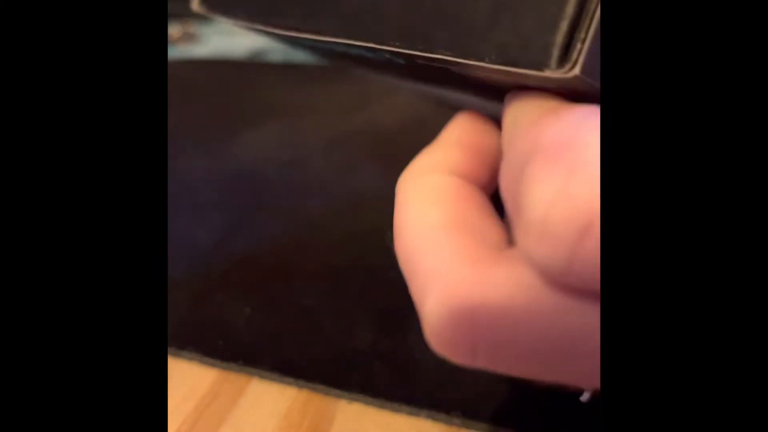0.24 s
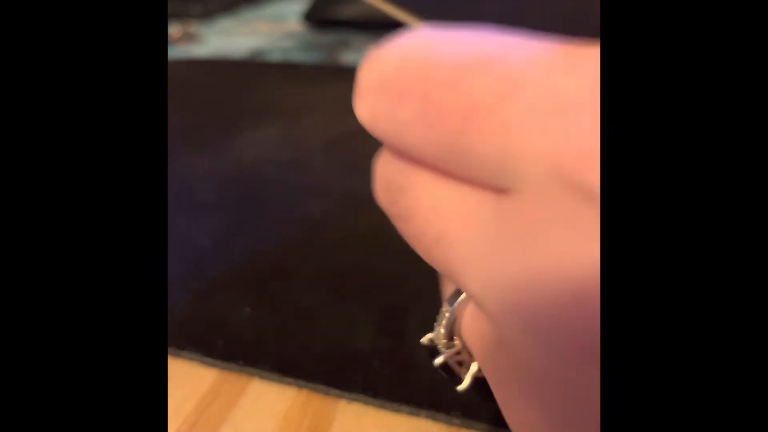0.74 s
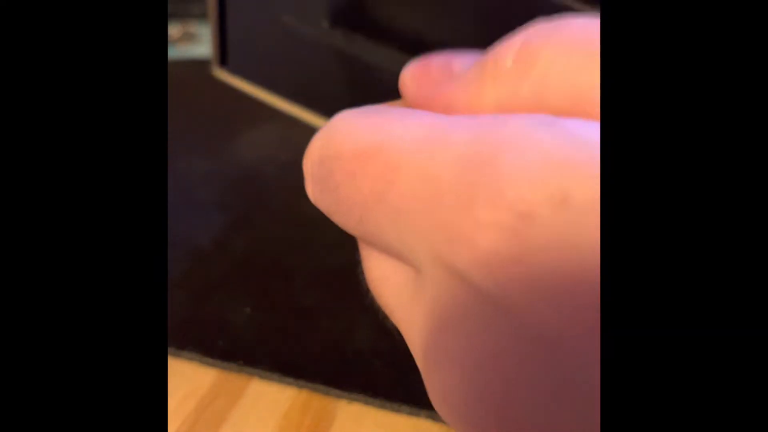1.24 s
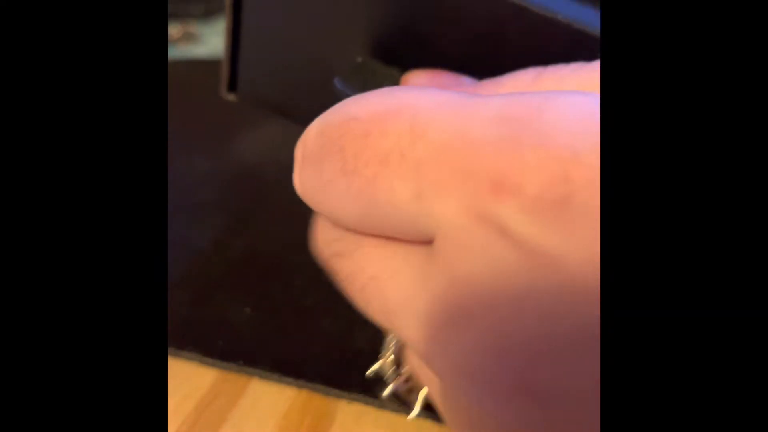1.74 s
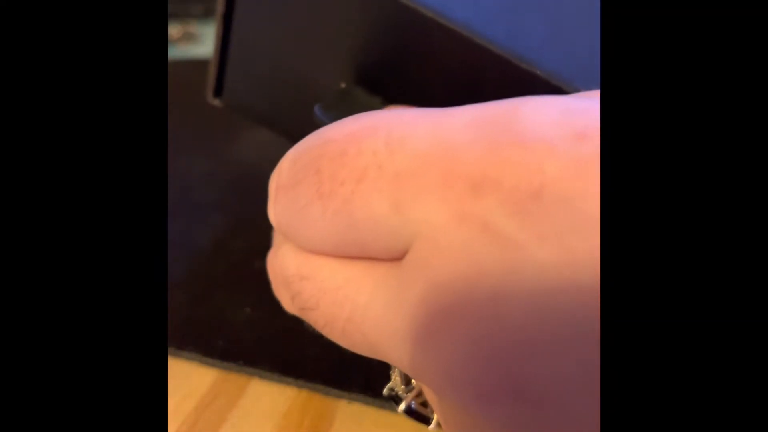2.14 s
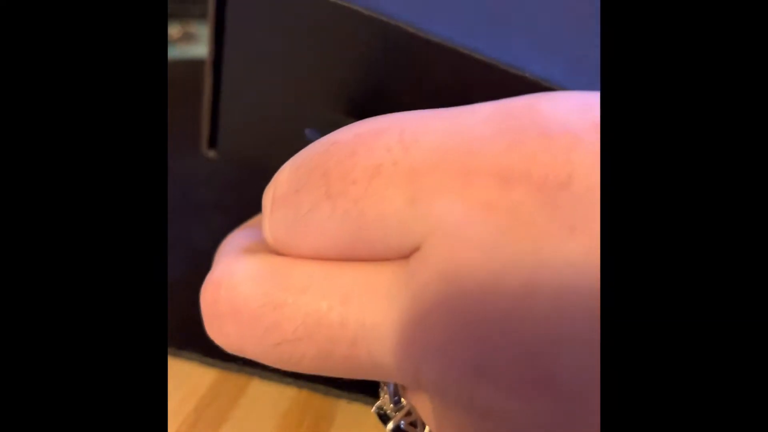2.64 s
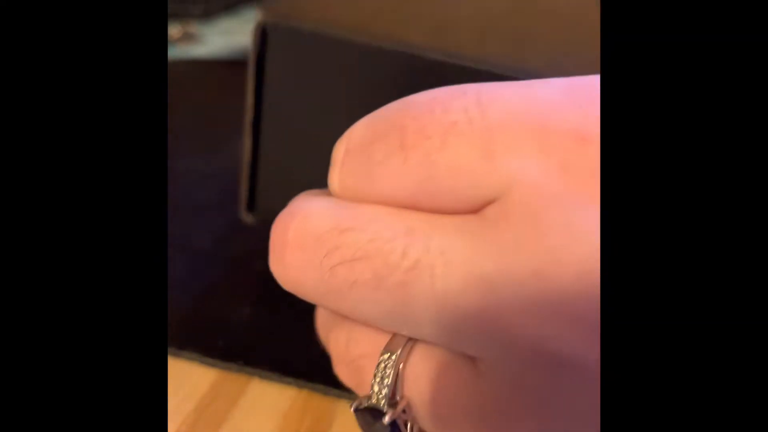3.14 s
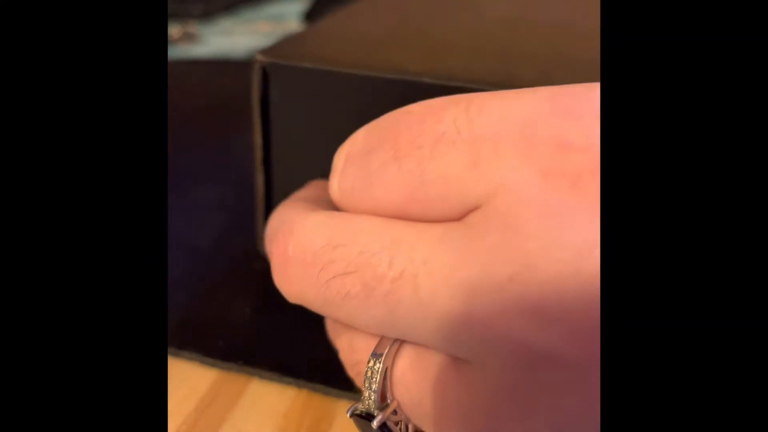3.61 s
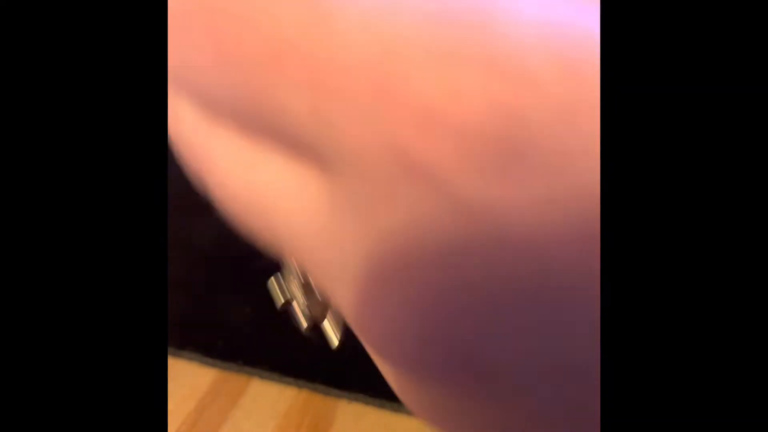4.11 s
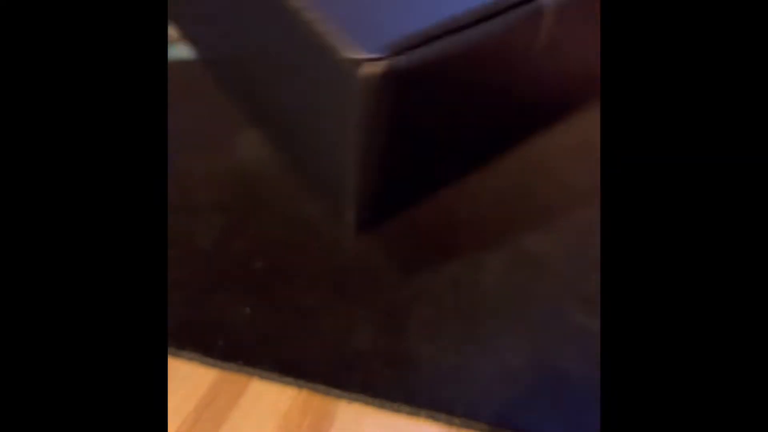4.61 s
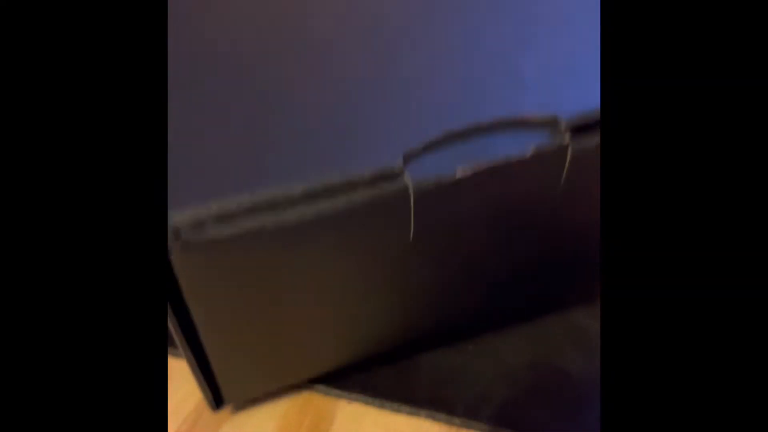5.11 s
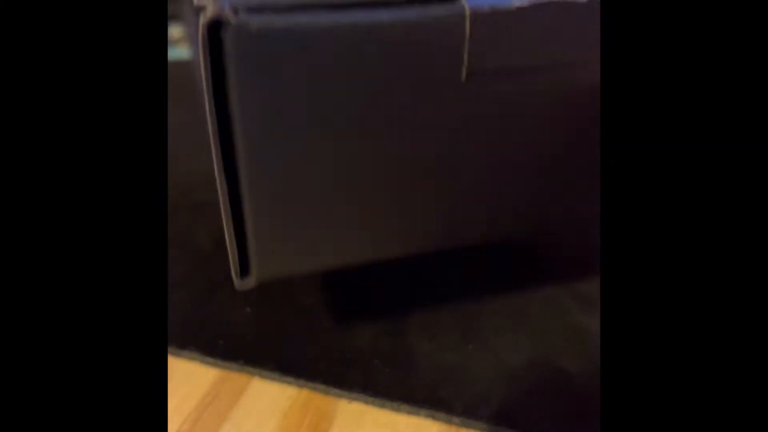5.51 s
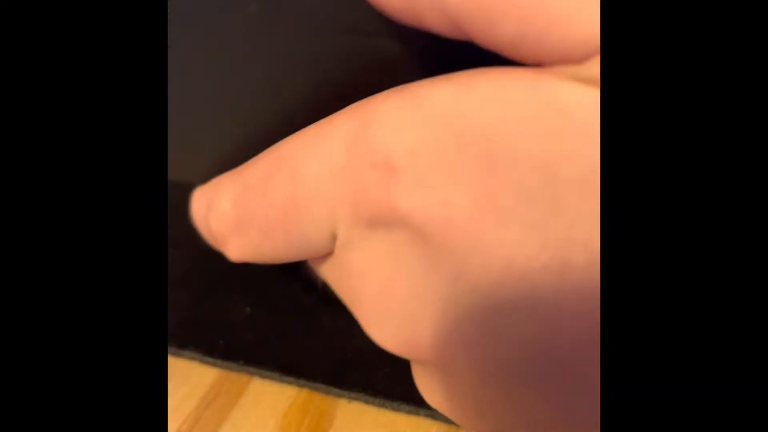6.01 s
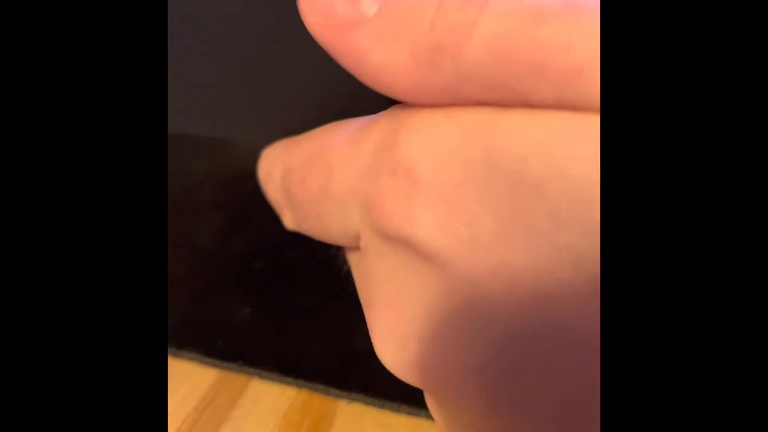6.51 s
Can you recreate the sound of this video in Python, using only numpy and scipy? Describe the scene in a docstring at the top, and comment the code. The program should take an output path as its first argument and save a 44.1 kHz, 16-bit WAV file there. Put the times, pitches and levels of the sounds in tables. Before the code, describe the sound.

Close cardboard handling in a quiet room: light scuffs and nail ticks, a hissy drag along one face, hollow knocks, and a loud crisp flap pop.

```python
"""A small cardboard box is turned by hand over a desk, close to a two-port microphone: fingers rub and tap it,
a long stroke slides along one face, the box knocks down and a flap snaps free.
Rubbing is shaped noise that drives a hollow wall; blows ring damped panel, wall and edge modes with noisy cracks.
Nails catch, skin scuffs and sprung flaps ring; a small dry room answers, over soft air and a low hum."""
import sys
import numpy as np
from scipy import signal
from scipy.fft import rfft, irfft, next_fast_len
from scipy.io import wavfile
from scipy.ndimage import uniform_filter1d, map_coordinates

SR = 44100
rng = np.random.default_rng(int(sys.argv[2]) if len(sys.argv) > 2 else 0)


def dump_mix(stems):
    """Bounce the given channels to the path in sys.argv[1] as a 16-bit WAV at rate SR."""
    frames = np.atleast_2d(stems).T  # one column per channel
    limited = np.clip(frames, -1, 1)  # hard clip at full scale
    pcm = np.round(limited * 32767).astype(np.int16)
    wavfile.write(sys.argv[1], SR, pcm)


N = 297675

# resting modes of the box walls: (frequency [Hz], relative level [dB], t60 [s])
WALL_MODES = [(432.5, -0.5, 0.076), (479, -4.5, 0.046), (555, 7, 0.023), (630, -3.5, 0.062),
              (680, -1, 0.021), (745, -2, 0.032), (936, -3, 0.056), (1045, -0.5, 0.064), (1100, -7, 0.028),
              (1190, -23, 0.022)]
# where the box is held: (time [s], left-right lean [dB], room answer [dB]: drier when near)
PLACE_PATH = [(0, 2.5, 2), (2.4, -0.5, -8), (2.85, 4, -2.5), (3.351, 2.5, 5.5), (3.6, 11, -1.5),
              (3.85, 9.5, 0), (4.2, 2.5, -3.5), (6.3, 1.5, -4.5)]
EDGE_HZ = 2600  # the fold mode that taps and bumps drive most


def amp(db):
    """Decibels to gain."""
    return 10 ** (np.asarray(db) / 20)


def unit(x):
    """Scale to rms 1."""
    return x / np.sqrt(np.mean(x ** 2) + 1e-20)


def along(points, hz):
    """Read (Hz, value) points on a log frequency axis."""
    f, v = np.transpose(points)
    return np.interp(np.log(hz + 1), np.log(f + 1), v)


def wobble(rate):
    """A smooth random curve, rate knots a second."""
    knots = rng.standard_normal(int(N * rate / SR) + 4)
    return map_coordinates(knots, [np.arange(N) * rate / SR])


def filtered(x, response):
    """Multiply the spectrum of x by a response of frequency."""
    n = x.shape[-1]
    m = next_fast_len(n + SR // 10)
    return irfft(rfft(x, m) * response(np.fft.rfftfreq(m, 1 / SR)), m)[..., :n]


def coloured(x, spectrum, size=4096):
    """Causal minimum-phase filter with the given (Hz, dB) spectrum."""
    cepstrum = irfft(np.log(amp(along(spectrum, np.fft.rfftfreq(size, 1 / SR)))))
    cepstrum[1:size // 2] *= 2
    cepstrum[size // 2 + 1:] = 0
    impulse = irfft(np.exp(rfft(cepstrum)))
    return signal.fftconvolve(x, impulse)[:len(x)]


def struck(x, t):
    """Scale a blow to rms 1 from 1 ms before contact to 11 ms after."""
    return x / np.sqrt(np.mean(x[(t > -.001) & (t < .011)] ** 2) + 1e-20)


def ring(modes, t, driven_hz, focus_db, detune, scatter_db):
    """Damped modes; the place of contact favours those near driven_hz, and every grip shifts them a little."""
    hz, db, t60 = np.transpose(modes)[:, :, None]
    shift, size, side = rng.standard_normal((3, len(modes), 1))
    favour = focus_db * np.exp(-(np.log(hz / driven_hz) / 0.24) ** 2)
    waves = np.sign(side) * np.sin(2 * np.pi * hz * np.exp(detune * shift) * t)
    return np.sum(waves * amp(db + favour + scatter_db * size - 60 * t / t60), 0)


def leaning(x, pan_db):
    """Two channels with a left-right level difference and unchanged power."""
    return unit(amp(np.array([[pan_db], [-pan_db]]) / 2)) * x


def in_room(x, wet_db, aim=1, size=256):
    """Direct sound at both ports, plus a fresh diffuse answer of desk and walls."""
    # phase by which the left port leads the right, at aim 1: (frequency [Hz], phase [rad])
    port_lead = [(100, 0), (350, -.55), (750, -1.5), (1200, -1.7), (1600, -5.1), (2450, -5.8), (3400, -8.8),
                 (5200, -9.8), (6700, -9), (8400, -6.4), (10000, -6.1), (12000, -3.2), (13400, -3),
                 (14800, 0)]
    # decay of the diffuse answer: (frequency [Hz], t60 [s])
    room_decay = [(100, 0.36), (500, 0.16), (2000, 0.13), (6000, 0.092), (15000, 0.25)]
    # diffuse answer before wet_db; deep bass and treble arrive mostly direct: (frequency [Hz], level [dB])
    wet_colour = [(60, -17), (150, -5.5), (300, -7), (700, -3.5), (3000, 1), (6000, -3.5), (15000, -22.5)]
    ports = np.array([[1], [-1]])
    direct = filtered(x, lambda hz: np.exp(.5j * aim * along(port_lead, hz) * ports))
    hz, t, z = signal.stft(rng.standard_normal((2, SR // 4)), SR, nperseg=size)
    decay = amp(-60 * t / along(room_decay, hz)[:, None])
    build_up = 1 - np.exp(-t / 0.00036)
    tail = signal.istft(z * decay * build_up, SR, nperseg=size)[1]
    answer = signal.fftconvolve(x, tail / np.linalg.norm(tail[0]), axes=1)[:, :x.shape[1]]
    return direct + filtered(answer, lambda hz: amp(wet_db + along(wet_colour, hz)))


def friction(spectrum, catches, catch_db, uneven_db, grit_db, patchy_db, size=512):
    """Tiny slips in gritty clumps and some larger catches a second; the colour drifts as the contact travels."""
    slips = unit(rng.standard_normal(N) * amp(grit_db * wobble(450)))
    larger = (rng.random(N) < catches / SR) * rng.standard_normal(N)
    z = signal.stft(slips + amp(catch_db) * unit(larger), nperseg=size)[2]
    # random patches, smoothed over frequency and then over time
    field = uniform_filter1d(rng.standard_normal(z.shape), size=5, axis=0)
    field = uniform_filter1d(field, size=22, axis=1)
    drifting = signal.istft(z * amp(patchy_db * unit(field)), nperseg=size)[1][:N]
    return unit(coloured(drifting, spectrum)) * amp(uneven_db * wobble(60))


def hollowed(x, size=1024):
    """Lift the band around the rubbed wall's hollow resonance, which moves with the hand."""
    # (time [s], frequency [Hz])
    hollow_path = [(1.7, 700), (1.95, 900), (2.15, 780), (2.45, 750), (3.1, 650), (4.3, 700), (4.5, 1080),
                   (6.15, 1080)]
    lift_db, width = 3.5, 0.14  # width as a share of the pitch
    hz, t, z = signal.stft(x, SR, nperseg=size)
    away = np.log((hz[:, None] + 1) / np.interp(t, *np.transpose(hollow_path))) / width
    return unit(signal.istft(z * amp(lift_db * np.exp(-away ** 2)), SR, nperseg=size)[1][:N])


def gestures(t):
    """(level dB, brightness dB) over time for the restless grip, the long slide and each short stroke."""
    # the holding hand never rests entirely, before its random waver: (time [s], level [dB])
    grip = [(0, -75), (2.4, -73), (2.65, -77), (3, -72), (4.6, -69), (4.85, -80), (5.4, -83.5), (5.7, -74),
            (6.25, -69), (6.5, -80)]
    # the long slide along one face: (time [s], level [dB])
    slide = [(1.6, -57.5), (1.68, -42.5), (1.75, -37.5), (1.85, -39), (1.94, -35.5), (2.06, -38.5),
             (2.35, -38.5), (2.49, -40), (2.55, -68)]
    # skin on card: (start [s], length [s], reference level [dB],
    # mid-stroke brightness [dB]: flat palm low, fingertip high; onset time per 20 dB of rise [s])
    strokes = [(0, 0.05, -53, -8.5, 0.0068), (0.161, 0.078, -58.5, -3, 0.02), (.32, 0.057, -68, -8, 0.032),
               (0.381, 0.0081, -63, 15, 0.01), (.41, 0.079, -64, -27.5, .03),
               (.49, 0.1, -66.5, 18.5, 0.062), (0.633, 0.012, -59, -6, 0.016),
               (0.736, 0.096, -67.5, 6, 0.011), (1.02, 0.15, -76, -15, 0.04),
               (1.197, 0.16, -60, -21, 0.067), (1.273, 0.093, -61, 0, 0.011),
               (1.363, 0.093, -52.5, -10.5, 0.0051), (1.44, .03, -59, -1, .02),
               (1.464, 0.0046, -41.5, -12, 0.0079), (1.51, 0.17, -54.5, -15, 0.043),
               (2.631, 0.21, -79.5, -12, 0.015), (2.95, 0.066, -60, -5, 0.06), (3.042, 0.06, -53, -4, 0.01),
               (3.106, 0.071, -52.5, -16.5, 0.014), (3.2, 0.16, -68.5, -26, 0.027),
               (3.324, 0.056, -62.5, -2.5, 0.0085), (3.41, 0.081, -61, -15, 0.13),
               (3.468, 0.14, -65.5, -9, 0.025), (3.578, 0.08, -53.5, -24, 0.028),
               (3.635, 0.13, -47, -17, 0.015), (3.77, .27, -55.5, -21, 0.034),
               (4.036, 0.076, -48.5, 5.5, 0.019), (4.263, 0.024, -43, 3, 0.1),
               (4.32, 0.036, -56, -7, 0.019), (4.415, 0.079, -61, -8, .04), (4.467, .155, -56, -8.5, 0.012),
               (4.716, 0.034, -67.5, -16, 0.022), (4.921, 0.052, -65, -7.5, 0.025),
               (5.125, .14, -76, -18, 0.015), (5.457, 0.06, -46.5, -6, 0.011), (5.643, 0.1, -61, -2, 0.011),
               (5.819, 0.3, -66.5, -13.5, 0.016), (6.215, 0.024, -62.5, -11, 0.018),
               (6.264, 0.019, -29, -12, 0.021), (6.33, 0.015, -37.5, -11, .015),
               (6.626, 0.0048, -58.5, -6, 0.018), (6.716, 0.024, -62.5, -22, 0.0083)]
    sag_db_per_s, release_db_per_s, dulls_db_per_s = 8, 297, 3
    s, db = np.transpose(slide)
    grip_db = np.interp(t, *np.transpose(grip)) + 3 * wobble(5.4)
    slide_db = np.interp(t, s, db, left=-np.inf, right=-np.inf)
    slide_bright_db = -4 - 5.5 * (t - s[0])  # the hand flattens as it travels
    moves = [(grip_db, -10.5), (slide_db, slide_bright_db)]
    pressure_db = 2.05 * wobble(24)  # a light touch presses unevenly
    for start, length, level_db, bright_db, rise in strokes:
        age = t - start
        attack = 20 * np.minimum(age / rise - .5, 0)
        release = release_db_per_s * np.maximum(age - length, 0)
        past_middle = np.clip(age, 0, length) - length / 2  # a stroke slows, so it sags and dulls
        stroke_db = level_db + pressure_db + attack - sag_db_per_s * past_middle - release
        moves.append((stroke_db, bright_db - dulls_db_per_s * past_middle))
    return moves


def travelling(x, wet_db, size=8192):
    """The hand keeps moving, so the room answers each short stretch afresh."""
    padded = np.pad(x, ((0, 0), (size, 2 * size)))
    out, fade = np.zeros_like(padded), signal.get_window("hann", size)
    for i in range(size // 2, N + size, size // 2):
        stretch = np.pad(padded[:, i:i + size] * fade, ((0, 0), (0, size)))
        out[:, i:i + 2 * size] += in_room(stretch, wet_db)
    return out[:, size:size + N]


def rubbing():
    """Sliding drives the walls into a hollow drone; the rough card scrapes, and hisses more under a fingertip."""
    # noise colours of rubbed card, low, middle and high: (frequency [Hz], relative level [dB])
    drone_colour = [(70, -27), (160, -5), (320, -4), (430, 2), (550, 1.5), (700, 2.5), (900, -1.5),
                    (1100, -0.5), (1350, -7), (2200, -28.5)]
    scrape_colour = [(800, -30), (1350, -3), (1650, -1.5), (2000, -4), (2350, -4), (3000, -2.5),
                     (3800, -3.5), (4500, 1), (5100, -4.5), (7000, -44)]
    hiss_colour = [(3300, -33), (5200, -12.5), (6600, 4), (7500, 1.5), (10000, 0.5), (13000, -4.5),
                   (16000, -3.5)]
    # colours of single slips and of snagged coarse fibres: (frequency [Hz], relative level [dB])
    crackle_colour = [(150, -19), (500, 17), (1100, -0.5), (3000, -2), (6000, -12), (16000, -22)]
    snag_colour = [(250, -18), (600, -2), (1050, 3), (1350, -7.5), (2400, -2), (4200, -0.5), (7000, -19.5)]
    levels = np.full((3, N), -np.inf)
    for db, bright_db in gestures(np.arange(N) / SR):
        # a brighter touch loses drone and gains hiss; the strongest gesture wins
        levels = np.maximum(levels, [db - 0.5 * bright_db, db, db + 0.51 * bright_db])
    drone_db, scrape_db, hiss_db = levels

    drive, pressing = [friction(drone_colour, catches=180, catch_db=-11, uneven_db=-1.6,
                                grit_db=1.5, patchy_db=3.0) for _ in range(2)]
    walls = ring(WALL_MODES, np.arange(SR // 4) / SR, 800, focus_db=7, detune=.008, scatter_db=1)
    hollow = unit(signal.fftconvolve(pressing, walls)[:N])
    drone = amp(drone_db - 10.5) * hollowed(drive + amp(-1.5) * hollow)
    scrape = amp(scrape_db - 5.5) * friction(scrape_colour, catches=280, catch_db=-11.0, uneven_db=0.64,
                                             grit_db=3, patchy_db=2)
    hiss = amp(hiss_db - 3.5) * friction(hiss_colour, catches=580, catch_db=-13.0, uneven_db=1.25,
                                         grit_db=-3.0, patchy_db=4.0)
    # a light touch sticks and slips in separate crackles, which grow no further once a stroke passes -58 dB
    sticks = (rng.random(N) < 45 / SR) * rng.standard_normal(N)
    crackle = amp(np.minimum(scrape_db, -58) - 5.5) * unit(coloured(sticks, crackle_colour))
    # dry skin also snags on coarse fibres, following the level of the stroke
    snags = (rng.random(N) < 190 / SR) * rng.standard_normal(N)
    grit = amp(scrape_db - 9) * unit(coloured(snags, snag_colour))
    rough = scrape + hiss + crackle + grit
    return travelling(leaning(drone, pan_db=3.0) + leaning(rough, pan_db=0.1), wet_db=3.0)


def room_tone():
    """Narrow bands of hum swell and fade irregularly over soft air noise, nearly alike at both ports."""
    # wavering hum bands: (centre [Hz], rms level [dB], waver [random knots per s])
    hum_bands = [(66.5, -58.5, 11), (207.6, -70, 5), (248, -74.5, 12), (310, -77, 12), (418, -81, 7.9),
                 (616, -87, 6)]
    # colour of the still air: (frequency [Hz], relative level [dB])
    air_colour = [(20, -2), (45, 9.5), (80, -5.5), (110, -3.5), (200, 0), (430, -10.5), (600, -22.5),
                  (800, -44), (2000, -31), (4500, -60.5), (6000, -53), (16000, -62)]
    t, hum = np.arange(N) / SR, 0
    for hz, db, waver in hum_bands:
        in_phase = (1 + wobble(waver)) * np.sin(2 * np.pi * hz * t)
        quadrature = wobble(waver) * np.cos(2 * np.pi * hz * t)
        hum = hum + amp(db) * unit(in_phase + quadrature)
    shared, left, right = [unit(coloured(rng.standard_normal(N), air_colour)) for _ in range(3)]
    return hum + amp(-65) * shared + amp(-67.0) * np.array([left, right])


def crack(spectrum, t, contact, drag_db, release_db, crush_db, crush_t60):
    """Card drags, gives way within the contact time, then its fibres crush briefly."""
    give = np.exp(-np.abs(t) / contact * np.where(t < 0, 2, 1))
    drag = amp(drag_db) * np.exp(-np.abs(t) / 0.0023)
    crush = amp(crush_db - 60 * np.abs(t) / crush_t60)
    around = np.where(t < 0, drag, crush)
    # one clean jolt dominates a short contact; a long one is mostly scuff
    release = amp(release_db) * (t == 0)
    return struck(coloured((give + around) * rng.standard_normal(len(t)) + release, spectrum), t)


def add(out, s, sound, wet_db, pan_db=0):
    """Add a small close sound, with its room answer, at time s."""
    heard = in_room(leaning(sound, pan_db), wet_db)
    out[:, round(s * SR):][:, :len(sound)] += heard


def nail_catches():
    """A nail catches on the cut edge, too lightly to move the box: only a bright crack is heard."""
    # (time [s], level [dB])
    catches = [(.016, -60), (.385, -65), (0.7884, -43.5), (.862, -70), (.982, -65), (1.072, -75),
               (1.112, -73), (1.169, -84), (1.561, -60), (5.458, -39.5), (6.22, -67), (6.249, -51)]
    # (frequency [Hz], relative level [dB])
    catch_colour = [(1500, -23.5), (4000, -13), (8000, 4.5), (12000, 5), (16000, -5)]
    out, t = np.zeros((2, N + SR)), np.arange(SR // 3) / SR
    for s, db in catches:
        snick = crack(catch_colour, t, 0.00044, drag_db=-25, release_db=12, crush_db=-14.5, crush_t60=.03)
        add(out, s, amp(db) * snick, wet_db=-1.5)
    return out[:, :N]


def scuffs(count=48):
    """Skin judders over the card: a run of tiny decaying slips whose pitch glides and scatters."""
    # (start [s], length [s], level [dB], first pitch [Hz], last pitch [Hz], pitch scatter [share])
    scuff_list = [(0.085, 0.011, -44, 2000, 1710, 0.42), (0.277, 0.011, -61.5, 1750, 1680, 0.26),
                  (0.315, 0.055, -77, 1540, 1250, 0.12), (3.625, 0.018, -45.5, 2290, 2400, 0.51),
                  (4.275, 0.016, -49, 2260, 2360, 0.023), (4.278, 0.031, -57, 3030, 3670, 0.03),
                  (4.977, 0.028, -60.5, 773, 696, 0.34), (5.121, 0.05, -61, 2090, 1500, 0.387),
                  (5.124, .18, -63, 800, 488, 0.21), (5.478, 0.08, -60, 1060, 1000, 0.054),
                  (5.665, 0.21, -70, 1080, 1060, 0.089), (5.723, 0.38, -74.5, 2710, 2500, 0.11),
                  (5.799, 0.33, -69, 650, 594, 0.035)]
    out, t = np.zeros((2, N + SR)), np.arange(SR // 3) / SR
    for s, length, db, first_hz, last_hz, scatter in scuff_list:
        progress = (np.arange(count) + rng.random(count)) / count
        pitch, strength = rng.standard_normal((2, count, 1))
        slip_hz = np.geomspace(first_hz, last_hz, count)[:, None] * np.exp(scatter * pitch)
        cycles = slip_hz * t[:SR // 50]
        swell = np.sin(np.pi * np.sqrt(progress))[:, None]
        slips = np.sin(2 * np.pi * cycles) * np.exp(-cycles / 3) * amp(5.7 * strength) * swell
        at = (progress * length * SR).astype(int)[:, None] + np.arange(SR // 50)
        run = np.bincount(at.ravel(), slips.ravel(), len(t))[:len(t)]
        loudness = np.sqrt(np.sum(run ** 2) / (length * SR))
        add(out, s, amp(db) * run / loudness, wet_db=1)
    return out[:, :N]


def plucks():
    """A wall or flap springs free and rings with one hollow decaying note."""
    # (time [s], level [dB], pitch [Hz], t60 [s])
    pluck_list = [(.088, -45.5, 520, 0.027), (0.1, -46, 1380, 0.043), (0.114, -41, 1067, 0.05),
                  (.122, -51, 940, 0.046), (.138, -47.5, 985, 0.018), (.282, -57, 1690, 0.014),
                  (0.282, -56, 460, .05), (0.4, -53.5, 1000, 0.024), (2.8572, -28, 870, 0.02),
                  (3.35, -46, 292, 0.09), (3.587, -37, 863, .035), (3.689, -25.5, 795, 0.028),
                  (3.701, -32, 403, 0.064), (4.187, -43, 340, 0.057), (4.202, -37, 713, 0.11),
                  (4.213, -43, 676, 0.059), (4.548, -57, 460, .05), (4.631, -54, 576, 0.015),
                  (4.755, -50.5, 628, 0.073), (4.754, -57, 1028, .04), (5.236, -59.5, 431, 0.37),
                  (5.458, -47.5, 1050, 0.064), (5.507, -45, 1050, 0.11), (6.107, -39.5, 424, 0.043),
                  (6.143, -49, 543, 0.017), (6.288, -21.5, 634, 0.072), (6.2882, -32, 1557, .02),
                  (6.3278, -19.5, 1957, 0.0062), (6.328, -28, 478, 0.018), (6.33, -25.5, 336, 0.077)]
    out, t = np.zeros((2, N + SR)), np.arange(SR // 3) / SR
    when, pan_db, _ = np.transpose(PLACE_PATH)
    for s, db, hz, t60 in pluck_list:
        note = np.sin(2 * np.pi * hz * t) * amp(-60 * t / t60) * (1 - np.exp(-t / 0.00088))
        add(out, s, amp(db) * struck(note, t), wet_db=-10, pan_db=np.interp(s, when, pan_db))
    return out[:, :N]


def favoured(spectrum, driven_hz, focus_db):
    """The place of contact lifts a spectrum around driven_hz."""
    return [(hz, db + focus_db * np.exp(-(np.log(hz / driven_hz) / 0.23) ** 2)) for hz, db in spectrum]


def blow(t, knock_db, thump_db, snap_db, tick_db, contact, panel_hz, wall_hz, edge_hz, pan_db, wet_db):
    """One contact flexes the panels, rings the walls and cracks at the edge it touches."""
    # resting modes of whole panels flexing on the enclosed air, the lowest a mode of the desk beneath:
    # (frequency [Hz], relative level [dB], t60 [s])
    panel_modes = [(66, -7, 0.34), (112, -2.5, 0.094), (184, -2, 0.07), (252, -9, 0.088), (249.7, -8, 0.13),
                   (301.6, -11.5, 0.15), (340, -4.5, 0.077)]
    # resting modes of stiff folds and edges: (frequency [Hz], relative level [dB], t60 [s])
    edge_modes = [(1430, -3.5, 0.044), (1673, 3.5, 0.072), (1940, -1.5, 0.01), (2230, -2.5, 0.011),
                  (2500, -3, 0.046), (2826, -3.5, 0.07), (3020, -4.5, 0.056)]
    # low, middle and high colours of struck card: (frequency [Hz], relative level [dB])
    knock_colour = [(100, -40.5), (250, -3), (450, -4), (750, -4.5), (1100, -4.5), (1450, -5.5),
                    (2500, -51.5)]
    snap_colour = [(700, -31), (1300, -9), (1750, -4.5), (2100, -2), (2600, -7.5), (3100, -1), (3900, -3.5),
                   (5000, -10.5), (7500, -51.5)]
    tick_colour = [(2800, -26.5), (4600, 3), (7500, -1), (10000, -2.5), (12500, -12), (16000, -4)]
    after = np.maximum(t, 0)
    press = 1 - np.exp(-after / contact)  # a slow contact sets the modes going gently

    panels = ring(panel_modes, after, panel_hz, focus_db=15.0, detune=0.024, scatter_db=4.5)
    panels = struck(press * panels, t)
    walls = ring(WALL_MODES, after, wall_hz, focus_db=10, detune=.015, scatter_db=2)
    walls = struck(press * walls, t)
    # the short waves along the folds reach each port in their own phase
    edges = [ring(edge_modes, after, edge_hz, focus_db=6, detune=.012, scatter_db=2) for _ in range(2)]
    edges = np.array([struck(press * edge, t) for edge in edges])

    dull_crack = crack(favoured(knock_colour, wall_hz, focus_db=7), t, contact,
                       drag_db=-9.5, release_db=15.0, crush_db=-9.0, crush_t60=0.035)
    knock = struck(walls + amp(-1.5) * dull_crack, t)
    edge_crack = crack(favoured(snap_colour, edge_hz, focus_db=5.5), t, contact,
                       drag_db=-10.5, release_db=2.5, crush_db=-22.5, crush_t60=0.06)
    snap = amp(-7.0) * edges + edge_crack
    tick = crack(tick_colour, t, contact * 1.3,
                 drag_db=-21.0, release_db=1.5, crush_db=-15.0, crush_t60=0.063)
    body = leaning(amp(knock_db) * knock, pan_db) + leaning(amp(thump_db) * panels, pan_db * 0.22)
    dry_blow = body + amp(snap_db - 6.0) * snap + amp(tick_db) * tick
    # each contact comes from a slightly different direction
    return in_room(dry_blow, wet_db, aim=1 + .07 * rng.standard_normal())


def tap(s, db, hardness, wall_hz, contact):
    """A finger barely flexes the panels; the more nail in a tap, the more it snaps and ticks."""
    # snap and tick settings over the knock, from softest pad to hardest nail
    snap_db = -16.5 + hardness * (4.5 - -16.5)
    tick_db = -45 + hardness * (8 - -45)
    thump_db, panel_hz = -13, 264
    return s, db, db + thump_db, db + snap_db, db + tick_db, contact, panel_hz, wall_hz, EDGE_HZ


def bump(s, db, panel_hz):
    """The mat cushions a bump, so it is mostly panel thump."""
    knock_db, snap_db, tick_db = -11.5, -20.5, -29.5  # settings over the thump
    wall_hz, contact = 600, 0.003  # Hz, s
    return s, db + knock_db, db, db + snap_db, db + tick_db, contact, panel_hz, wall_hz, EDGE_HZ


def contacts():
    """Knocks, taps and bumps all ring the same box, from wherever it is held."""
    # fingers tap the card: (time [s], knock level [dB], hardness [0 pad - 1 nail],
    # most driven wall mode [Hz], contact time [s])
    taps = [(0.017, -51.5, 0.66, 740, 0.0033), (.087, -49, 0.76, 570, 0.0006),
            (0.104, -47, 0.92, 1200, 0.0015), (.122, -47, 0.36, 1045, 0.00074),
            (0.282, -51, 0.52, 410, 0.0006), (0.511, -52, 0.48, 460, 0.0012),
            (.778, -46, 0.76, 626, 0.00037), (.787, -47, 0.63, 587, 0.0024),
            (.919, -51.5, 0.71, 870, 0.0046), (0.982, -57.5, 0.7, 456, 0.0025),
            (1.032, -67.5, 0.62, 970, 0.0012), (1.105, -58.5, 0.19, 800, 0.00097),
            (1.168, -61, 0.69, 700, 0.0012), (1.286, -47, 0.67, 1010, 0.005),
            (1.298, -45.5, 0.68, 860, 0.0035), (1.402, -47, 0.69, 930, 0.00049),
            (1.483, -41.5, 0.74, 533, 0.0035), (1.541, -50, 0.63, 850, 0.0005),
            (1.558, -45.5, 0.8, 500, 0.0022), (1.594, -45.5, 0.56, 700, 0.0006),
            (1.968, -45, 0.81, 950, 0.00066), (2.05, -50, 0.6, 905, 0.0008), (2.849, -29, 0.3, 1085, 0.001),
            (2.876, -32, 0.35, 540, 0.00091), (3.348, -45.5, 0.03, 500, 0.0032),
            (3.361, -59, 0.05, 1030, 0.0017), (3.5757, -43, 0.25, 890, 0.0006),
            (3.587, -42.5, 0.5, 850, 0.00049), (3.633, -46.5, 0.6, 850, 0.0027),
            (3.742, -53, 0.76, 700, 0.002), (3.815, -40.5, 0.091, 600, 0.00047),
            (3.8311, -40, 0.21, 890, 0.00099), (3.86, -49.5, 0.1, 880, 0.003),
            (3.879, -48, 0.15, 600, 0.0026), (3.901, -49, 0.56, 900, 0.004), (3.923, -54, 0.42, 900, .003),
            (4.185, -35.5, 0.59, 1010, 0.00021), (4.2015, -35.5, 0.25, 1020, 0.00058),
            (4.214, -41.5, 0.2, 890, 0.00074), (4.222, -39.5, 0.56, 710, 0.00031),
            (4.229, -43.5, 0.29, 1000, 0.00065), (4.249, -36.5, 0.3, 965, 0.0017),
            (4.288, -47.5, 0.36, 460, 0.02), (4.496, -49, 0.62, 535, 0.0082),
            (4.549, -52.5, 0.22, 650, 0.0041), (4.631, -54.5, 0.85, 620, 0.0009),
            (4.756, -55.5, 0.22, 630, 0.0055), (4.915, -58.5, 0.82, 637, 0.0021),
            (5.46, -38, 0.58, 870, 0.00085), (5.502, -50, 0.85, 710, 0.017), (5.535, -49, 0.9, 880, 0.0043),
            (6.106, -50.5, 0.083, 517, 0.0015), (6.143, -53.5, 0.58, 536, 0.004),
            (6.249, -44, 0.93, 480, 0.00052), (6.262, -36.5, 0.55, 630, 0.0038)]
    # the box bumps and rocks on the soft mat: (time [s], thump level [dB], most driven panel mode [Hz])
    bumps = [(0.112, -43, 175), (1.482, -41, 290), (2.505, -36.5, 185), (3.348, -48, 257),
             (3.587, -40, 213), (3.602, -42.5, 190), (3.633, -48, 182), (3.814, -34, 212), (3.83, -36, 240),
             (3.846, -42, 250), (3.858, -35.5, 180), (3.867, -45, 238), (3.897, -39.5, 200),
             (4.915, -49, 167), (6.294, -29, 175.5), (6.336, -29.5, 171.5), (6.725, -50, 254)]
    # the box lands or its flap snaps: (time [s], wall knock level [dB], panel thump level [dB],
    # edge snap level before a 6 dB cut [dB], nail tick level [dB], contact time [s],
    # most driven panel mode [Hz], most driven wall mode [Hz], most driven edge mode [Hz])
    knocks = [(2.481, -36.5, -36.5, -41, -67, 0.0042, 225, 740, 2400),
              (2.498, -30, -37.5, -33.5, -50, 0.0035, 183.6, 555, 2200),
              (2.8405, -25.5, -27, -24.5, -47, 0.0005, 225, 800, 2150),
              (2.8448, -28, -27.5, -34, -52.5, 0.00029, 265, 453, 2100),
              (2.857, -21, -33.5, -20.5, -43.5, 0.00055, 248, 720, 2480),
              (2.868, -30.5, -33.5, -43, -52, 0.0017, 215, 544, 2720),
              (3.685, -54, -36, -32, -29.5, 0.0022, 189, 1030, 4400),
              (3.6895, -30, -47, -30, -30.5, 0.00025, 182.5, 770, 2300),
              (3.6955, -29, -34, -47, -49, 0.00025, 211, 638, 2300),
              (3.707, -46, -29, -57, -54, 0.00082, 222, 433, 2300),
              (3.722, -48, -34, -39.5, -48, 0.002, 189, 430, 1524),
              (6.278, -29, -49, -24, -24, 0.0039, 189.4, 449, 2546),
              (6.2815, -34, -47.5, -17, -19, 0.00064, 190, 651, 2800),
              (6.2885, -27, -28.5, -19, -26, 0.001, 172, 640, 2917),
              (6.324, -24, -41.5, -30.5, -39.5, 0.0008, 335, 642, 2070),
              (6.328, -25, -32.5, -15, -23.5, 0.0004, 320, 418, 1982)]
    lead = SR // 25  # room for the drag before each contact
    out, t = np.zeros((2, N + SR)), np.arange(-lead, SR // 3) / SR
    events = [*knocks, *[tap(*row) for row in taps], *[bump(*row) for row in bumps]]
    when, pan_db, wet_db = np.transpose(PLACE_PATH)
    for s, *touch in events:
        heard = blow(t, *touch, np.interp(s, when, pan_db), np.interp(s, when, wet_db))
        out[:, round(s * SR):][:, :len(t)] += heard
    return out[:, lead:lead + N]


def scene():
    """Box and hands in the quiet room."""
    return rubbing() + room_tone() + nail_catches() + contacts() + scuffs() + plucks()


def record(dry):
    """The microphone chain loses the deepest bass, rounds off high peaks and ends steeply at its band limit."""
    top_hz = 15850
    x = signal.sosfilt(signal.butter(4, 34, "highpass", fs=SR, output="sos"), dry)
    x = x / (1 + np.abs(x / .85) ** 4) ** (1 / 4)
    return filtered(x, lambda hz: 1 / np.sqrt(1 + (hz / top_hz) ** 400))


dry = scene()
out = record(dry)
dump_mix(out)
```